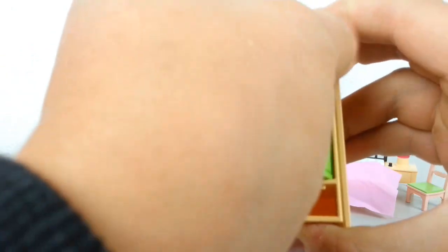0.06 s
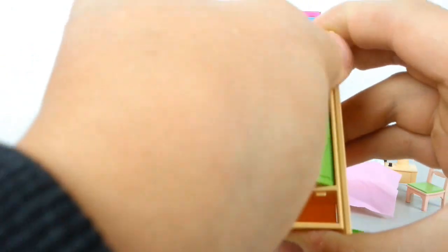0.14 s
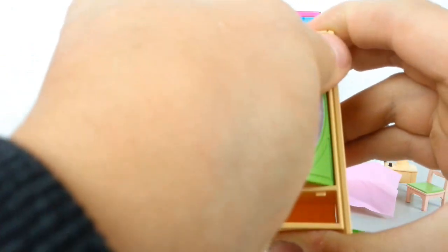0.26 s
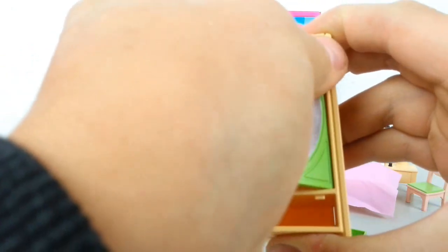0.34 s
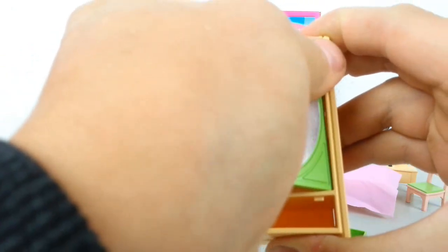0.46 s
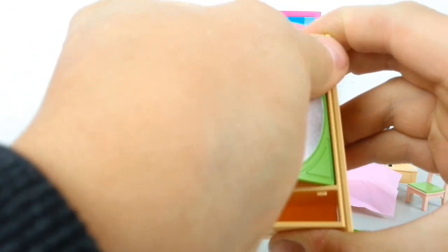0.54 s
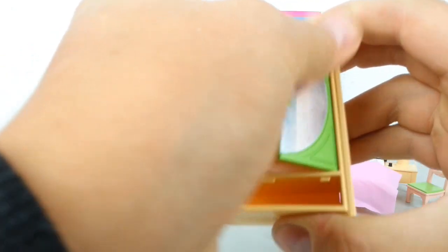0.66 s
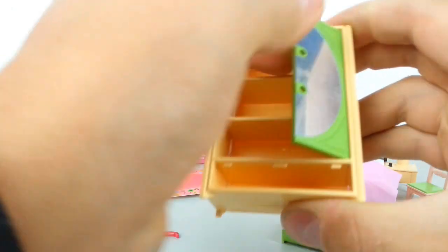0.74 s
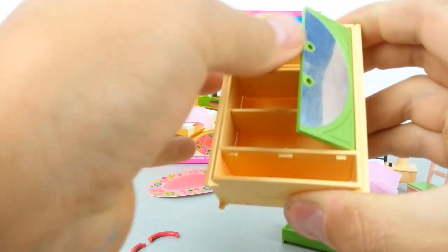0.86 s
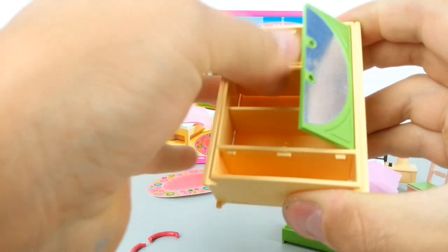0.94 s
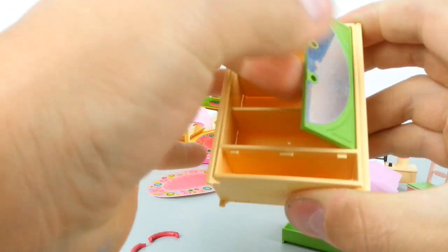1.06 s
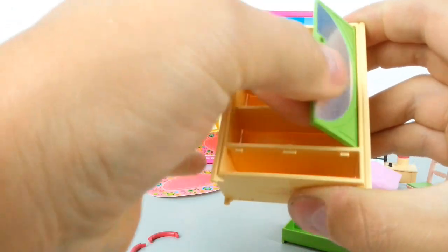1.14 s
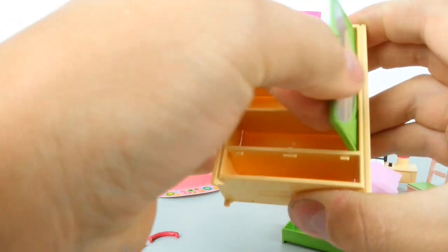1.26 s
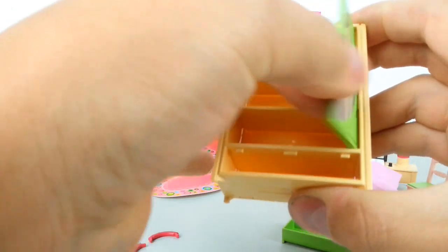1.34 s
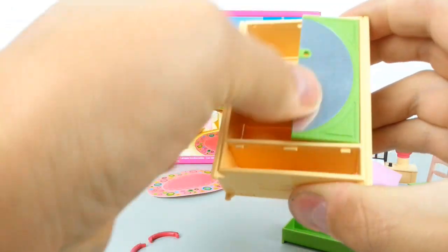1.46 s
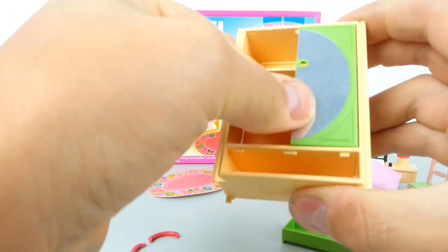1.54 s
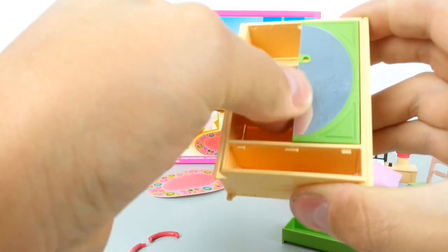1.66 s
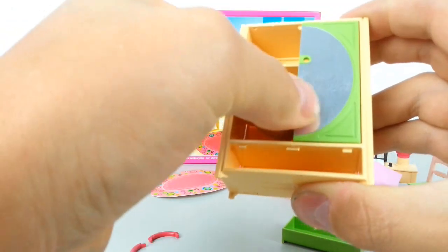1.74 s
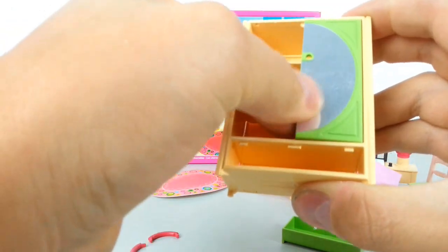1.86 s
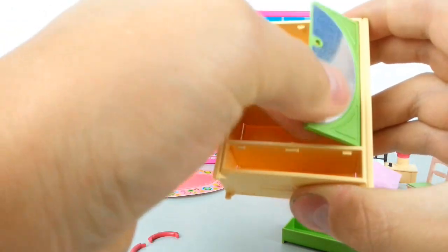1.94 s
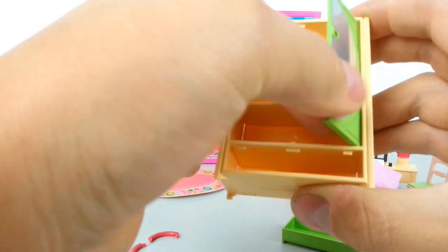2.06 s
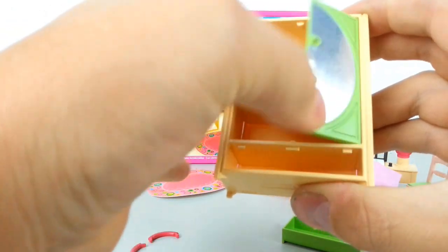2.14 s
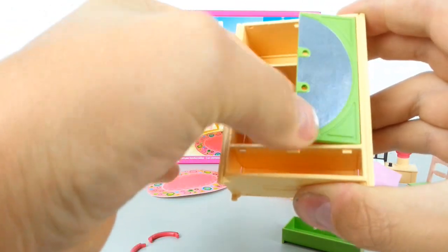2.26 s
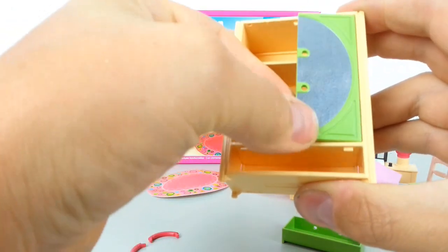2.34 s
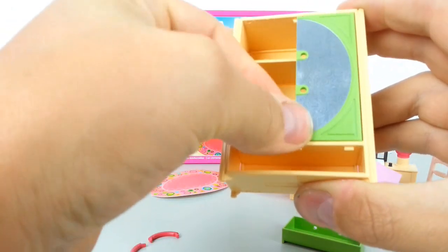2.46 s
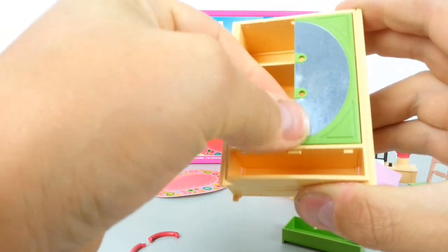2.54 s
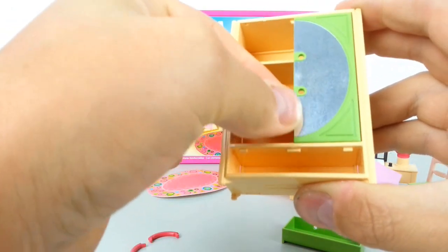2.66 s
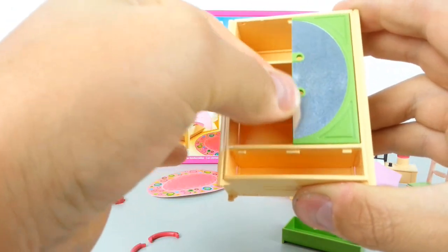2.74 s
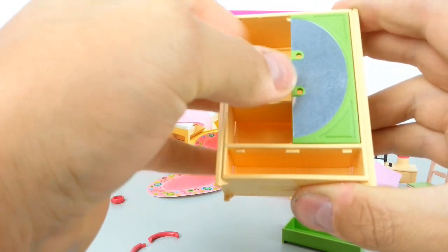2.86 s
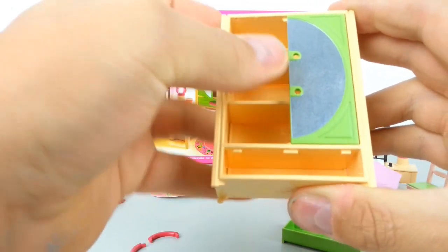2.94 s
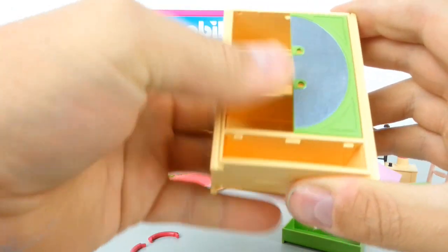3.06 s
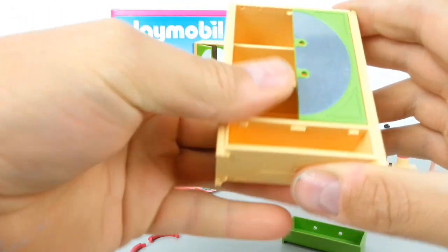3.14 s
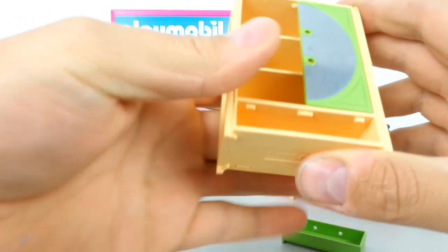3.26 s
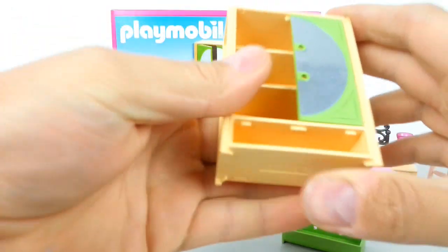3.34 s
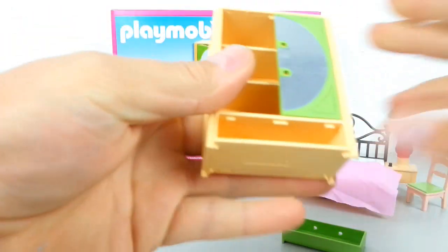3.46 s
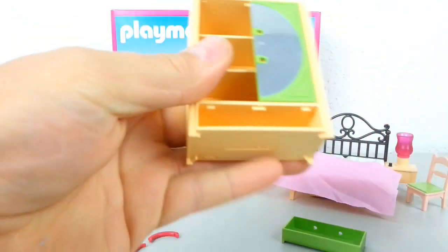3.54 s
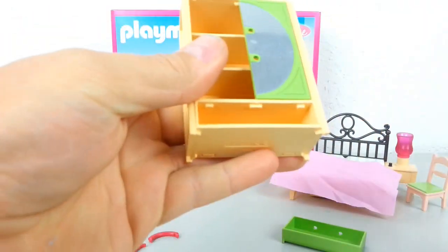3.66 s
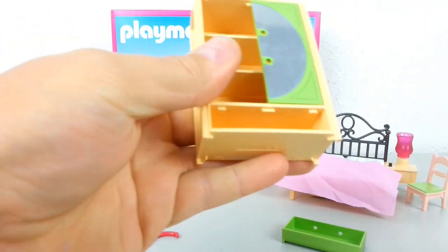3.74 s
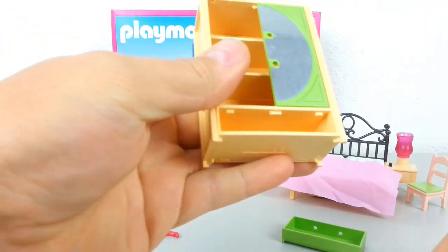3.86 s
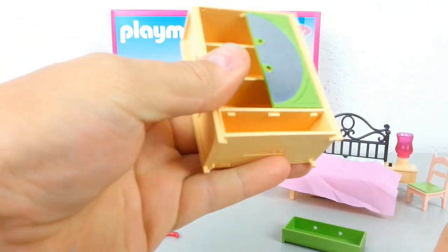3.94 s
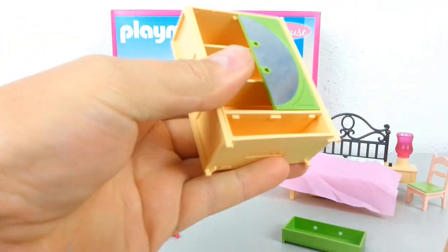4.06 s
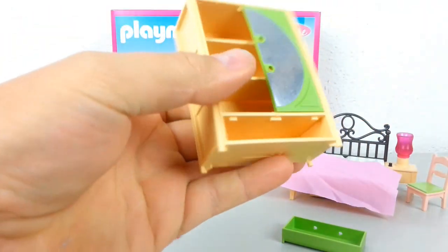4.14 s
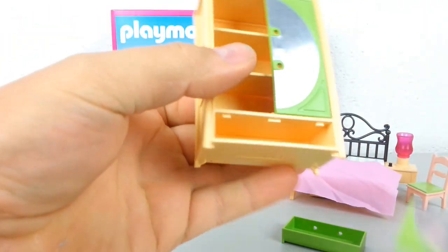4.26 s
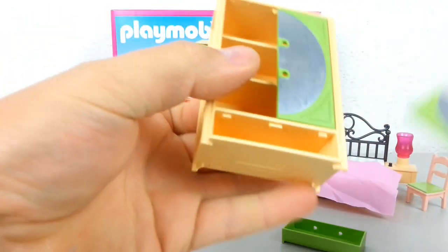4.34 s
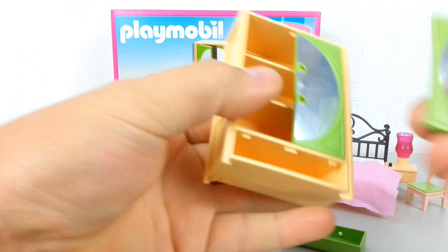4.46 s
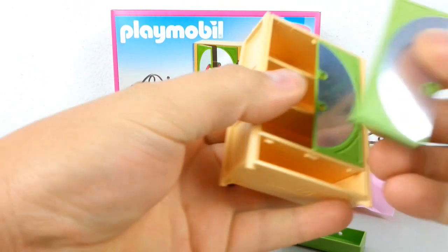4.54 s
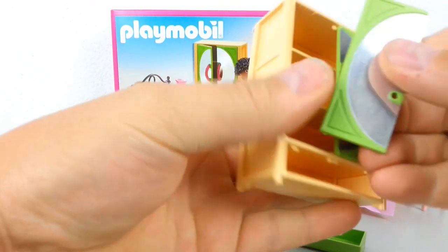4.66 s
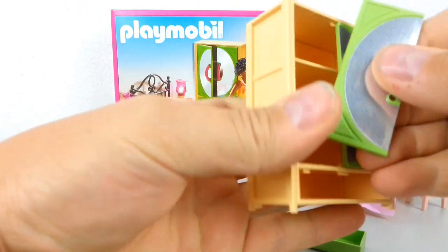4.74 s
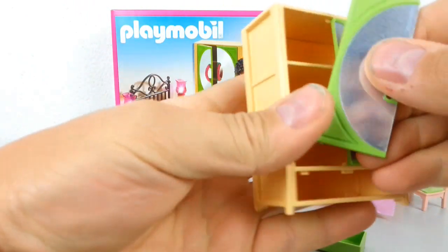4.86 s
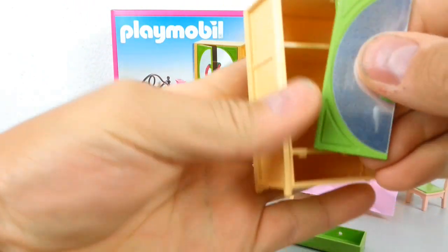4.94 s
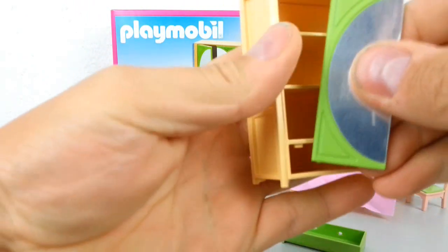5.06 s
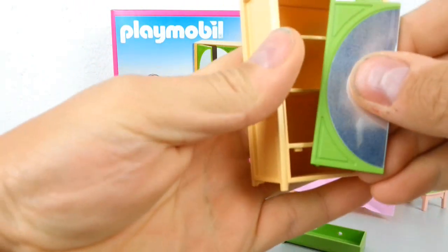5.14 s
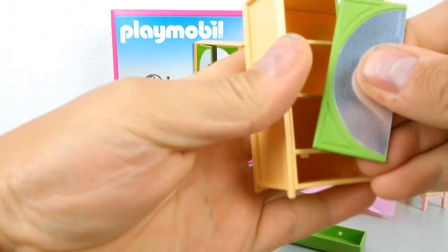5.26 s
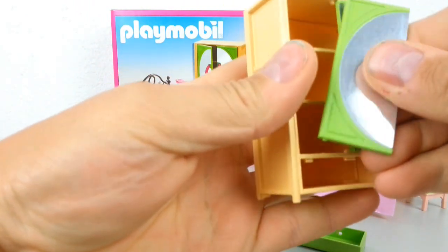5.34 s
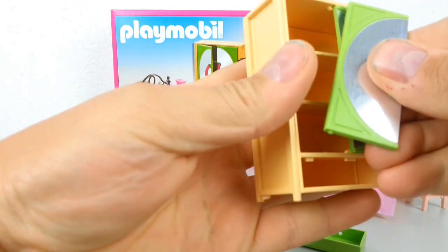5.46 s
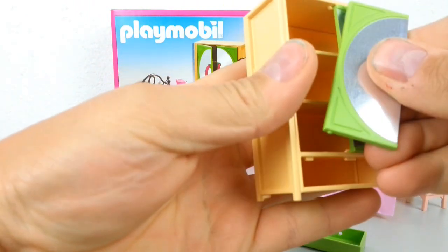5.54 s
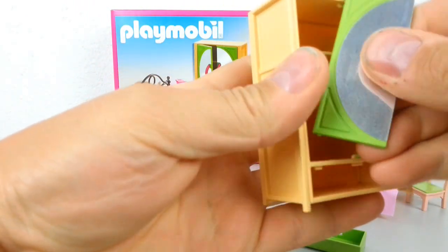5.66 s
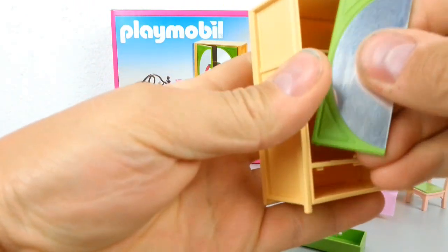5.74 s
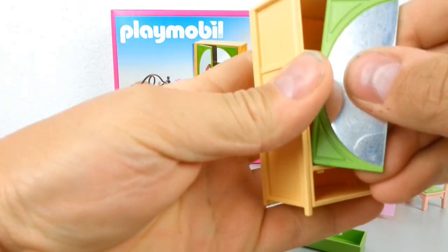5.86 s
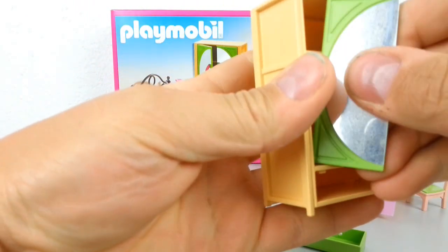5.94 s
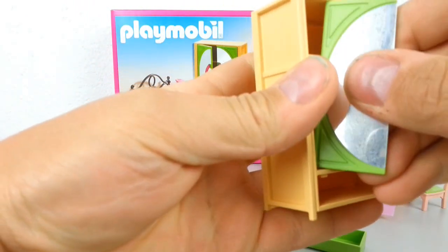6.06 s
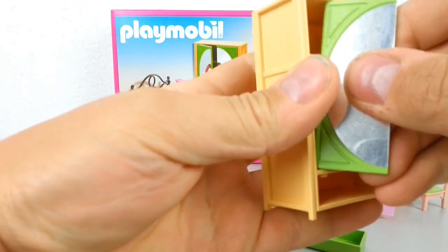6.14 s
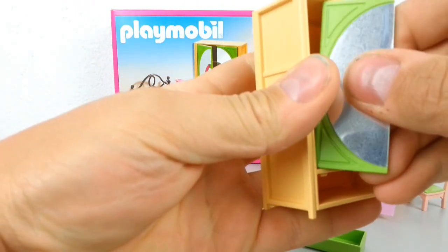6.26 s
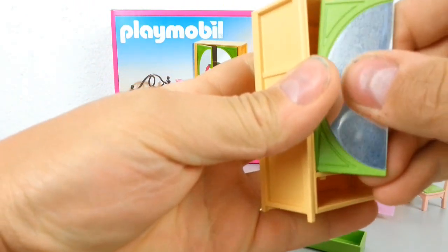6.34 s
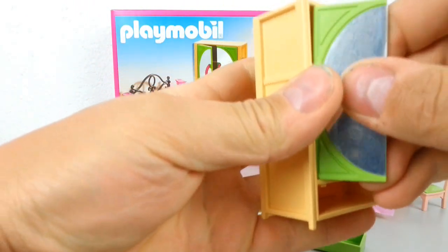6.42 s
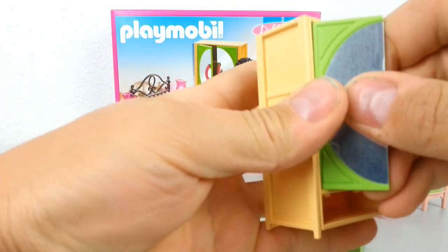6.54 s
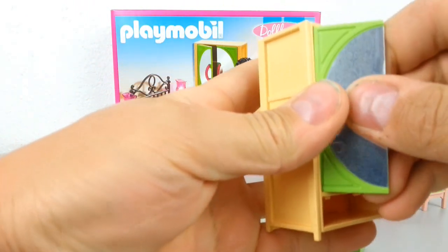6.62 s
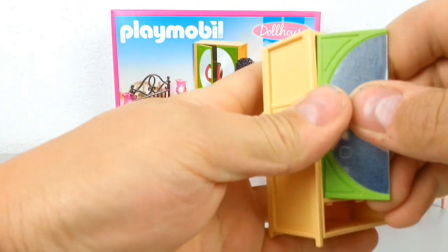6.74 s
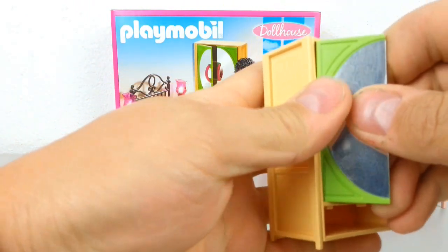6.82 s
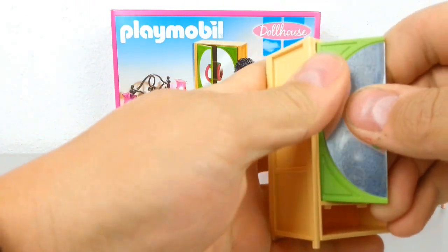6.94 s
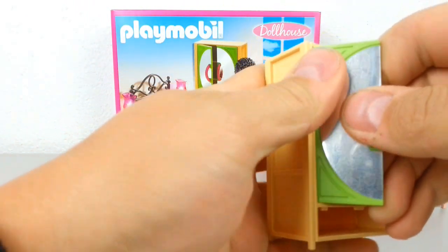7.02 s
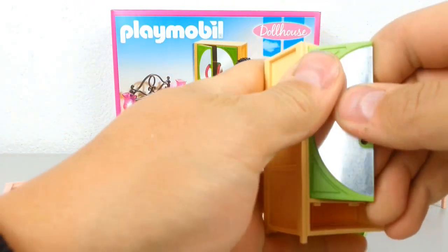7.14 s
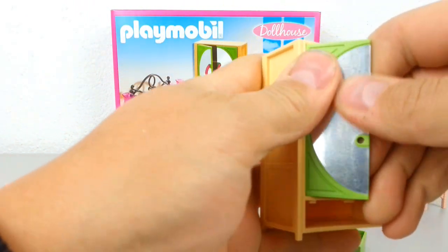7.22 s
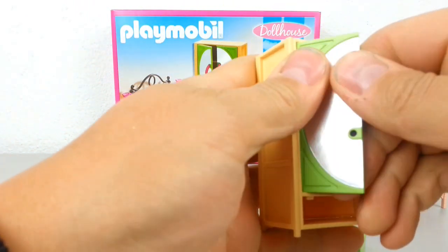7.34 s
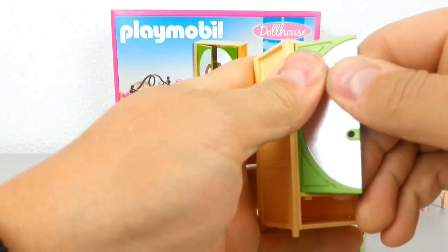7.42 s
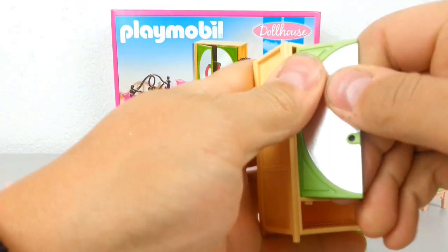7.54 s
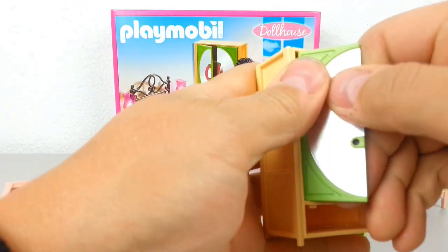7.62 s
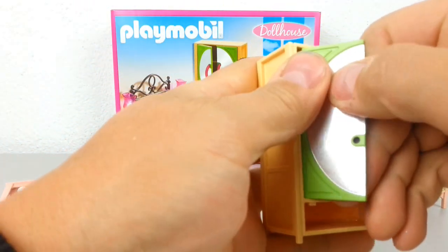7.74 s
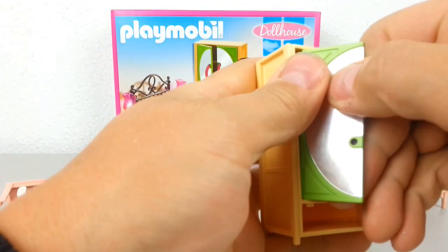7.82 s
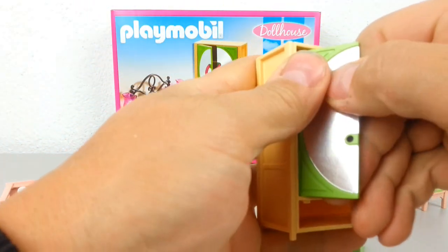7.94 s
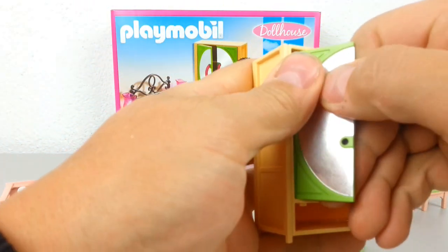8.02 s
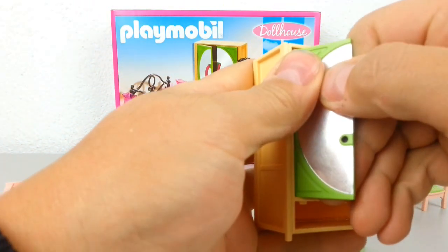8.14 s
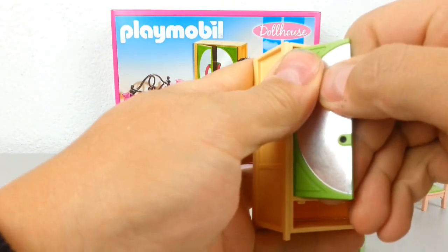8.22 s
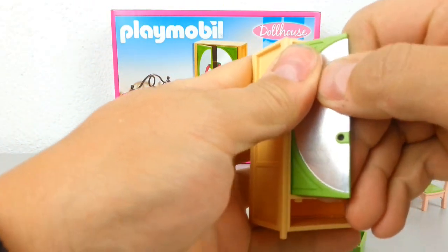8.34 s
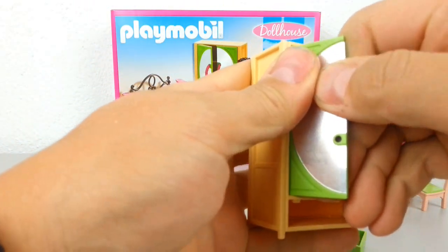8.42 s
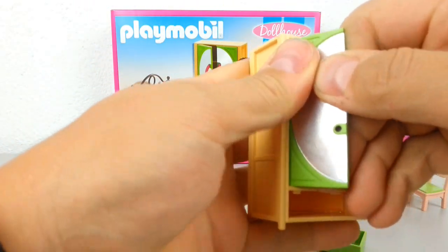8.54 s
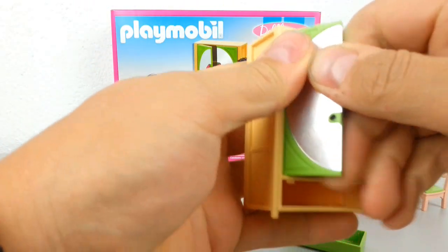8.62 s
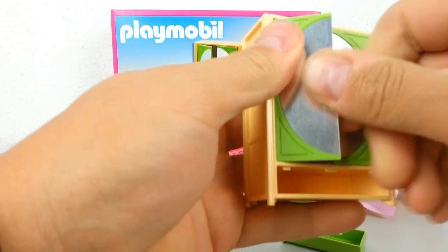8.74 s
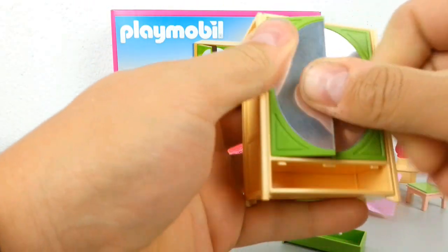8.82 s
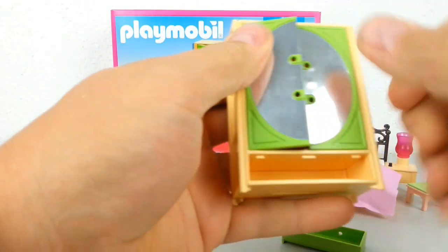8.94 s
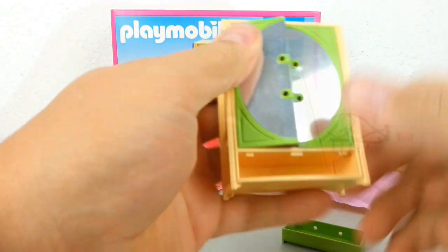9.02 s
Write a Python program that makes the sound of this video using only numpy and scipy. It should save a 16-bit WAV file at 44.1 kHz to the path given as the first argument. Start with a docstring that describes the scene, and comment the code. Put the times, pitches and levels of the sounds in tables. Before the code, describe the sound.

Small hollow plastic toy wardrobe ticks, knocks and scrapes in handling hands, with two sharp hinge snaps, heard very close in a small room.

```python
"""Doors tick and knock on a small hollow plastic toy wardrobe, close to a stereo microphone in a small room.
Each contact rings decaying tones; twice a hinge pin snaps home with a crack, a ring and a brief low thump,
overloading the input. A door scrapes along the case in swelling strokes of rough, filtered noise.
Between these, hands bump the case, palms rub it dully and fingertips rustle, all as shaped noise and low tones.
A small room answers the contacts, scrapes and snaps, over a quiet background noise."""
import sys
import numpy as np
from scipy import signal
from scipy.fft import rfft, irfft, next_fast_len
from scipy.io import wavfile
from scipy.ndimage import map_coordinates

SR = 44100
rng = np.random.default_rng(int(sys.argv[2]) if len(sys.argv) > 2 else 0)


def dump(signal):
    """Clip the signal to [-1, 1] and save it as 16-bit WAV at the path in sys.argv[1]."""
    limited = np.clip(np.atleast_2d(signal).T, -1, 1)
    pcm = np.round(limited * 32767).astype(np.int16)
    wavfile.write(sys.argv[1], SR, pcm)


N = 400428
TIME = np.arange(N) / SR  # s, through the whole scene
AGE = np.arange(SR // 2) / SR  # s, since one blow

# door and case contacts: start_s, middle_db, knock_db and edge_db (both relative to middle_db), slip_ms, spot (name)
CONTACTS = [(0.032, -38, -14, -8.5, 3.5, "side"), (0.565, -26, -11, -23.5, 0.542, "back"),
            (0.648, -21, -30.5, -1, 6, "back"), (0.874, -47.5, -15.5, -2, 0.275, "hinge"),
            (0.89, -44.5, -15.5, 4.5, 0.294, "rim"), (1.005, -47, -11, -3.5, 0.265, "door face"),
            (1.1624, -28.5, -20.5, -5.5, 0.26, "door face"), (1.183, -35, -21.5, -3.5, 2.76, "door face"),
            (1.277, -52.5, -15.5, -3, .3, "door face"), (1.336, -44, -32.5, -14.5, 0.34, "door face"),
            (1.5924, -44.5, -19.5, -9, 0.373, "door edge"), (1.647, -40, -1.5, 5, 4.28, "door edge"),
            (1.6592, -22.5, -14, -8, 0.292, "door edge"), (1.695, -32.5, -13, -7, 5, "side"),
            (1.703, -29, -9, -6.5, .3, "shelf"), (1.774, -37, -5, 5, 1.535, "door edge"),
            (2.083, -36, -8.5, -10, 0.252, "door stop"), (2.095, -17, -13.5, -3.5, 3.84, "door stop"),
            (2.275, -53, -17.5, -18.5, 0.32, "door face"), (2.4258, -54, -1, -1, 0.27, "door edge"),
            (2.522, -44.5, -11.5, -7.5, 0.308, "side"), (2.616, -36.5, -6.5, -8, 3.4, "side"),
            (2.627, -41, -22, -3.5, 3.044, "side"), (2.6367, -35.5, -6, 2.5, 0.319, "door edge"),
            (3.4057, -37.5, 4.5, -8, 0.986, "back"), (3.844, -43.5, 3.5, -18, .3, "back"),
            (4.114, -41.5, 6.5, -9, 5, "corner"), (4.3118, -42, -11, 0.5, 0.33, "rim"),
            (4.368, -28, -16, -4, 3, "rim"), (5.069, -44, -1.5, -3, 0.303, "door edge"),
            (6.0853, -38.5, -28, 1.5, 0.33, "hinge"), (6.138, -37.5, -16.5, -13, 4.59, "hinge"),
            (6.37, -33.5, -16.5, -16.5, 8.4, "door edge"), (6.38, -25.5, -20, -5.5, 1.894, "hinge"),
            (6.5196, -41.5, -14.5, -23, 7.2, "shelf"), (6.586, -34, -17.5, -15.5, 2.51, "side"),
            (6.597, -37.5, -29, -12.5, 7.3, "shelf"), (6.6249, -40, -22.5, -10, 6.65, "side"),
            (6.642, -41, -21.5, -11.5, 5.86, "shelf"), (6.8445, -40.5, -16, -6.5, 0.307, "side"),
            (6.984, -42.5, -2, -19.5, 3.7, "door stop"), (7.3, -48.5, -11, -10.5, 0.267, "corner"),
            (7.694, -54, -5.5, -4.5, 0.284, "corner"), (8.047, -40, 1.5, 5.5, 1.4, "corner"),
            (8.0698, -28.5, -11, -12.5, 0.347, "shelf"), (8.342, -54.5, 2.5, 0.5, 0.264, "corner"),
            (8.415, -48.5, -6, -2.5, 0.22, "corner"), (8.47, -42.5, -28, -6, 0.195, "shelf"),
            (8.837, -39, -18, 0, 3.5, "shelf"), (8.854, -39, -7, -3.5, 3.23, "corner"),
            (8.9221, -36.5, -14, 1, 0.31, "corner"), (9.053, -50, -15.5, -.5, 0.31, "side")]
# where door and case meet, with the leading tones there: knock_hz, wall_hz, wall_db, door_hz, door_db
CONTACT_SPOTS = {"back": (260, 1100, 16, 2200, 3), "door face": (575, 1592, 13.4, 2510, 13.1),
                 "door edge": (250, 1550, 11.04, 3204, 5.17), "door stop": (714, 1328, 8.2, 2362, 4.5),
                 "shelf": (275, 1259, 13.27, 2508, 2), "side": (260, 1294, 8.86, 3400, 6.9),
                 "rim": (423.5, 1930, 0.5, 2142.5, 3), "hinge": (702.5, 1607, 10.44, 3760, 16.47),
                 "corner": (274.5, 1231, 7.04, 3937, 10.2)}
# tones of the hollow case: pitch_hz, level_db, fade_s (time to fall 60 dB)
CASE_TONES = [(253.68, -15.5, 0.24), (389.5, -8, 0.025), (574, -12, .03), (664, -5, 0.05),
              (1190, -5, 0.016), (1261, -0.5, 0.034), (1551, 1.5, .03), (1647, -9.5, 0.035),
              (2130, -7, 0.0084), (2580, -7.5, 0.0067), (2963, -6.5, 0.054), (3036, -0.5, .018),
              (3470, -2, 0.043), (3967, 0, 0.012), (4548, -4.5, 0.04), (4850, -5.5, .014),
              (7810, -13.5, 0.013)]
# colour of the rattle in each contact: pitch_hz, level_db (relative)
RATTLE_COLOUR = [(120, -22.5), (250, -1.5), (800, -6.5), (1400, 8.5), (4200, -1), (6000, -9.5), (9000, -13),
                 (15000, -23.5)]
# hinge pins snapping home: start_s, ring_db, crack_db, thump_db
PIN_SNAPS = [(0.5971, 7, 3, -13), (8.563, 2.5, -6.5, -55)]
# tones of the first and the second door: pitch_hz, level_db, fade_s (time to fall 60 dB)
DOOR_TONES = [
    [(1003.5, -9.5, 0.029), (1062.3, -2.5, 0.037), (1154.9, -8.5, 0.037), (1296, -11.5, 0.039),
     (1623, -15, .03), (2198.8, -9, 0.053), (2267.4, -5.5, 0.082), (2816, -12.5, 0.024),
     (3512.3, -15.5, 0.041), (3980, -12.5, .022), (4648, -17, 0.015)],
    [(663, -27, 0.0956), (1155.3, -5.5, 0.03), (1292.7, 0, 0.048), (1375.8, -6, 0.0367),
     (1723, -5.5, 0.0165), (2065.3, -9, 0.033), (3350, -10.5, 0.0274), (3727.5, -12, 0.0278),
     (4368, -13.5, 0.0216), (8033, -8.5, 0.0133)],
]
# colour of the snap's crack: pitch_hz, level_db (relative)
CRACK_COLOUR = [(90, -56), (260, -23), (450, -24.5), (800, -10.5), (1200, -0.5), (2500, -1.5), (4200, -1.5),
                (6000, -10.5), (9500, -11), (15000, -24)]
# sliding strokes: peak_s, level_db (before the scrape gain), rise_s (time to rise 20 dB), panel_hz
STROKES = [(0.06, -53, 0.07, 3650), (1.04, -54.5, 0.053, 2510), (1.179, -43, 0.0122, 1600),
           (1.35, -50, 0.0406, 1734), (1.681, -38, 0.019, 1463), (2.72, -52.5, 0.0243, 3350),
           (2.992, -53, 0.047, 2016), (3.176, -52.5, 0.027, 2390), (3.281, -43.5, 0.0257, 4320),
           (3.314, -43.5, 0.0227, 2353), (3.456, -40.5, 0.057, 2220), (3.62, -53, 0.12, 4430),
           (4.166, -39.5, 0.0586, 3370), (4.196, -35.5, 0.0224, 3840), (4.26, -49.5, 0.017, 2155),
           (4.367, -26, 0.0489, 1280), (4.69, -47, 0.065, 1590), (4.929, -44, 0.0626, 3570),
           (5.2, -52, 0.092, 2304), (6.008, -47.5, 0.0573, 1685), (7.02, -55, 0.072, 4250),
           (7.472, -51.5, 0.079, 1250), (8.061, -40, 0.0198, 3686), (8.975, -48, 0.025, 1574)]
# colour of the sliding noise: pitch_hz, level_db (relative)
SCRAPE_COLOUR = [(120, -50), (300, -4), (900, 0.5), (1400, 1), (2000, -0.5), (4000, 0), (6000, -14),
                 (10000, -15.5), (15000, -37.5)]
# colour of the biting edge: pitch_hz, level_db (relative)
BITE_COLOUR = [(2500, -21.5), (5000, -2), (6000, -5), (9000, -12), (14500, -24.5)]
# case resonances that rubbing excites: pitch_hz, width_hz, level_db
RUBBED_TONES = [(1204, 200, 0), (1600, 160, -5.5), (2290, 80, -3), (3547, 95, -5), (4080, 46, -8),
                (4305, 93, -4), (4819, 120, -3.5)]
# soft bumps of the hand on the case: start_s, level_db
HAND_BUMPS = [(3.845, -36), (4.118, -44.5)]
# hollow after-ring of the bumps: pitch_hz, level_db, fade_s (time to fall 60 dB)
HOLLOW_TONES = [(129.3, -12.5, 0.774), (161.52, -13.5, 0.304), (202.9, -4.5, 0.515), (283.8, -15.5, 0.45),
                (356.7, 4, 0.137)]
# rubbing while the hands settle, before the layer gains: start_s, palm_db, fingertip_db
HANDS_SETTLING = [(0.0, -59.5, -49.5), (0.332, -67.5, -66), (0.54, -66.5, -66.5)]
# rubbing while they turn the case and fit the door: start_s, palm_db, fingertip_db
HANDS_TURNING = [(0.95, -60.5, -60.5), (1.48, -66.5, -63), (2.38, -62.5, -61), (3.14, -66.5, -65.5),
                 (3.56, -54.5, -47.5), (3.87, -56.5, -57), (4.17, -59.5, -67), (4.27, -58, -54),
                 (5.11, -56.5, -55.5), (5.28, -63, -62), (5.79, -70.5, -68), (6.1, -61, -59),
                 (6.4, -63.5, -67.5), (6.54, -60.5, -60), (6.79, -66, -66), (7.32, -59.5, -59.5),
                 (7.68, -65, -63.5), (8.5, -63, -64.5)]
# rubbing while they let go: start_s, palm_db, fingertip_db
HANDS_LETTING_GO = [(8.88, -55.5, -58.5), (8.96, -61, -56.5), (9.08, -61.5, -57.5)]
# colour of the palms: pitch_hz, level_db (relative)
PALM_COLOUR = [(50, -22), (110, -14), (200, 0.5), (300, 0), (450, -7), (800, -8.5), (1400, -25.5)]
# colour of the fingertips: pitch_hz, level_db (relative)
FINGER_COLOUR = [(400, -22.5), (900, -3.5), (1280, -3.5), (1600, 0.5), (2000, -4.5), (2500, -3.5),
                 (4400, -7), (6000, -16.5), (10000, -19), (15000, -27)]
# how long the room rings: pitch_hz, fade_s (time to fall 60 dB)
ROOM_FADE = [(150, 0.47), (600, 0.48), (1200, .45), (4000, .42), (7000, .36), (14000, 0.22)]
# colour of the background noise: pitch_hz, level_db (relative)
QUIET_COLOUR = [(15, -47.5), (25, -24.5), (87, -8), (179, -10), (240, -19.5), (368, -18), (443, -22.5),
                (480, -14), (716, -21), (910, -20.5), (1010, -20.5), (2780, -23), (6350, -27.5),
                (12400, -25.5), (14500, -30.5)]

KNOCK_CYCLES, WALL_CYCLES, DOOR_CYCLES = 28, 51, 100  # cycles in which a leading tone falls 60 dB
DETUNE = 0.012  # typical random shift of a leading tone from blow to blow (share of its pitch)
CLICK_PAN_DB = -1.5  # left minus right
RELEASE_OVER_RISE = 1.05  # a stroke dies about as fast as it swells
SCRAPE_GAIN_DB, PANEL_DB = 2.0, -8  # gain of all strokes; singing panel relative to the sliding noise
BITE_LEAD_S, BITE_DB = 0.0164, -11  # the edge bites before the stroke peaks; level relative to the slide
HARD_STROKE_DB, BITE_GROWS = -43, 0.57  # softer strokes bite less: dB of bite per dB below a hard stroke
PALM_GAIN_DB, FINGER_GAIN_DB = 3, 4
FAINT_DB = -66.5  # fingertip rubbing near or below this level is turned down further
QUIET_DB = -58
TOP_HZ = 14800  # upper band limit


def clicks():
    """Each contact rings the case; the spot where it lands decides which knock, wall and door tones lead."""
    out = np.zeros((2, N))
    size = SR // 8
    # knock, middle and edge bands, in Hz
    edges_hz = ((150, 850), (850, 2000), (2000, 15000))
    bands = [signal.butter(3, edges, "band", fs=SR, output="sos") for edges in edges_hz]
    pan = amp([[CLICK_PAN_DB / 2], [-CLICK_PAN_DB / 2]])
    for start, middle_db, knock_db, edge_db, slip_ms, spot in CONTACTS:
        knock_hz, wall_hz, wall_db, door_hz, door_db = CONTACT_SPOTS[spot]
        tones = [(knock_hz, -3, KNOCK_CYCLES), (wall_hz, wall_db, WALL_CYCLES), (door_hz, door_db, DOOR_CYCLES)]
        leading = [(hz * (1 + DETUNE * rng.standard_normal()), db, cycles / hz) for hz, db, cycles in tones]
        jolts = slips(slip_ms, growth_db=7.5)
        tap = ring(CASE_TONES, side=1.0, scatter_db=5.5, size=size)
        tap = tap + ring(leading, side=0.41, scatter_db=1, size=size)
        ringing = signal.fftconvolve(tap, jolts[None], axes=1)
        # every jolt also rattles the loose parts anew, so the rattles add in power
        one_rattle = amp(3 - 60 * AGE[:size] / 0.05)
        shaking = np.sqrt(np.convolve(jolts ** 2, one_rattle ** 2))
        hit = ringing + shaking * noise(RATTLE_COLOUR, side=0.86, size=len(shaking))
        # the hardness of the contact shares the blow between knock, middle and edge
        for band, relative_db in zip(bands, (knock_db, 0, edge_db)):
            part = signal.sosfilt(band, hit)
            strength = np.sqrt(np.mean(part[:, :round(0.015 * SR)] ** 2))  # over the first 15 ms
            add(out, start, pan * amp(middle_db + relative_db) * part / strength)
    return out


def slips(slip_ms, growth_db):
    """Stick-slip: sliding gives sparse, uneven, growing jolts up to a last firm one; a short tap may have only that."""
    length = round(abs(slip_ms) * SR / 1000) + 1
    uneven = rng.standard_normal(length)
    chosen = rng.random(length) < 0.04
    force = uneven * chosen * amp(np.linspace(-growth_db, 0, length))
    force[-1] = 1
    return force


def snaps():
    """A bent door lets go as its pin finds the hole: a crack, a hard ring and one brief low thump."""
    rings, cracks, thumps = np.zeros((3, 2, N))
    thump_age = AGE / 0.006  # in steps of 6 ms
    thump = ((1 - thump_age) * np.exp(-thump_age))[None]
    for (start, ring_db, crack_db, thump_db), tones in zip(PIN_SNAPS, DOOR_TONES):
        crack = noise(CRACK_COLOUR, side=0.66, size=len(AGE)) * amp(crack_db - 60 * AGE / 0.04)
        add(cracks, start, crack)
        add(rings, start, amp(ring_db) * ring(tones, side=0.6, scatter_db=0.5))
        add(thumps, start, amp(thump_db) * thump)
    # the flat door beams its ring at the microphone, while the crack spreads all round the room
    scattered = cracks + amp(-5) * rings
    return rings + cracks + thumps + room(scattered, wet_db=-7, near_db=-6)


def scrapes():
    """Plastic slides in clumps of tiny slips that swell and die with each stroke and set one panel singing."""
    out = np.zeros((2, N))
    grip = amp(2.03 * wobble(98) + 2.88 * wobble(900))
    friction = rubbed(noise(SCRAPE_COLOUR, side=0.733, grip=grip), plain=2.51)
    bite = amp(BITE_DB) * noise(BITE_COLOUR, side=1.0, grip=grip)
    for peak, level_db, rise, panel_hz in STROKES:
        span = slice(max(round((peak - 0.3) * SR), 0), round((peak + 0.4) * SR))
        rubbing = friction[:, span]
        panel_filter = signal.iirpeak(panel_hz, 20, SR)
        panel = amp(PANEL_DB) * unit(signal.lfilter(*panel_filter, rubbing))
        slide = stroke(peak, rise)[span] * (rubbing + panel)
        bite_strength = amp(BITE_GROWS * min(level_db - HARD_STROKE_DB, 0))
        edge = bite_strength * stroke(peak - BITE_LEAD_S, 0.568 * rise)[span] * bite[:, span]
        out[:, span] += amp(level_db + SCRAPE_GAIN_DB) * (slide + edge)
    return out


def stroke(peak, rise):
    """Pressure of one slide: it swells to its peak and dies away, 20 dB per rise or release time."""
    before = (peak - TIME) / rise
    after = (TIME - peak) / (rise * RELEASE_OVER_RISE)
    return amp(-20 * np.maximum(before, after))


def rubbed(x, plain):
    """Friction noise, partly heard directly and partly through the resonances of the case."""
    def body(f):
        return sum(amp(db) * 1j * f * width / (hz * hz - f * f + 1j * f * width)
                   for hz, width, db in RUBBED_TONES)

    # the noise is played backwards here, so that it does not line up with the direct part
    resonant = unit(filtered(x[:, ::-1], body))
    return unit(plain * x + resonant)


def bumps():
    """Soft flesh starts gently and wakes only the lowest resonances, which hum on."""
    out = np.zeros((2, N))
    soft_start = 1 - np.exp(-AGE / 0.00273)
    for start, level_db in HAND_BUMPS:
        add(out, start, amp(level_db) * ring(HOLLOW_TONES, side=0.25, scatter_db=4.5) * soft_start)
    return out


def hands():
    """Palms rub the case dully while fingertips rustle over its ribs, both as unsteady coloured noise."""
    start, palm_db, finger_db = np.vstack([HANDS_SETTLING, HANDS_TURNING, HANDS_LETTING_GO]).T
    palm_level = amp(np.interp(TIME, start, palm_db) + PALM_GAIN_DB + 1.5 * wobble(25))
    palm = palm_level * noise(PALM_COLOUR, side=0.71, grip=amp(3.2 * wobble(120)))
    # faint fingertip rubbing is turned down further, so the background noise covers it
    slide = amp(np.interp(TIME, start, finger_db))
    slide = slide * slide / (slide + amp(FAINT_DB))
    finger_level = amp(FINGER_GAIN_DB + 1.6 * wobble(30)) * slide
    rustle = noise(FINGER_COLOUR, side=0.68, grip=amp(2.8 * wobble(400)))
    return palm + finger_level * rubbed(rustle, plain=1.1)


def room(x, wet_db, near_db):
    """Table and toys nearby add a short echo to the longer one of the walls; noise differs in each channel."""
    hz, t, pieces = signal.stft(rng.standard_normal((2, SR // 2)), SR, nperseg=256)
    fading = pieces * amp(-60 * t / along(ROOM_FADE, hz)[:, None])
    tail = signal.istft(fading, SR, nperseg=256)[1]
    age = np.arange(tail.shape[1]) / SR
    onset = np.clip(age / 0.003 - 1, 0, 1)  # silent for 3 ms, full at 6 ms
    near = amp(near_db - 60 * age / 0.1)
    answer = tail / np.linalg.norm(tail[0]) * onset * (1 + near)
    return amp(wet_db) * signal.fftconvolve(x, answer, axes=1)[:, :N]


def background():
    """Steady coloured noise, strongest in the bass, with a faint hiss on top."""
    return amp(QUIET_DB) * noise(QUIET_COLOUR, side=1.0)


def ring(tones, side, scatter_db, size=len(AGE)):
    """Struck tones start together, in alternating directions, shifted oppositely in left and right."""
    hz, db, fade = np.transpose(tones)[:, :, None]
    strength, skew = rng.uniform(-1.0, 1, (2, len(hz), 1))
    sign = (-1) ** np.arange(len(hz))[:, None]
    t = AGE[:size]
    envelope = sign * amp(db + abs(scatter_db) * strength - 60 * t / fade)
    channels = [envelope * np.sin(2 * np.pi * hz * t + way * side * skew) for way in (1, -1)]
    return np.array([channel.sum(0) for channel in channels])


def noise(colour, side, size=N, grip=1):
    """Coloured stereo noise of rms 1; grip makes it stronger and weaker before colouring."""
    white = grip * spread(rng.standard_normal((2, size)), side)
    return unit(filtered(white, lambda hz: amp(along(colour, hz))))


def wobble(rate):
    """A smooth random curve through a given rate of random points a second."""
    points = rng.standard_normal(int(N * rate / SR) + 4)
    return map_coordinates(points, [TIME * rate])


def spread(pair, side):
    """Left and right from a common part and a share of a differing part."""
    return np.array([pair[0] + side * pair[1], pair[0] - side * pair[1]])


def filtered(x, response):
    """Reshape the spectrum of x by a gain for each frequency."""
    n = x.shape[-1]
    padded = next_fast_len(n + 8192)
    spectrum = rfft(x, padded) * response(np.fft.rfftfreq(padded, 1 / SR))
    return irfft(spectrum, padded)[..., :n]


def along(points, hz):
    """Read a table of pitch and value at any pitch, on a log axis."""
    f, value = np.transpose(points)
    return np.interp(np.log(hz + 1), np.log(f + 1), value)


def add(track, start, sound):
    """Mix a sound in at a time, cutting it at the end of the track."""
    part = track[:, round(start * SR):][:, :sound.shape[1]]
    part += sound[:, :part.shape[1]]


def unit(x):
    """Scale to rms 1."""
    return x / np.sqrt(np.mean(x ** 2) + 1e-20)


def amp(db):
    """Decibels to gain."""
    return 10 ** (np.asarray(db) / 20)


def scene():
    """The toy, the hands and the room over a quiet background."""
    taps, strokes = clicks(), scrapes()
    quiet = background()
    echo = room(taps + amp(6) * strokes, wet_db=-15.5, near_db=8.5)
    toy = taps + strokes + echo
    return toy + snaps() + bumps() + hands() + quiet


def record(dry):
    """The input clips at full scale, then a steep filter removes what lies above the band limit."""
    clipped = np.clip(dry, -1, 1)
    return filtered(clipped, lambda hz: 1 / (1 + (hz / TOP_HZ) ** 80))


dry = scene()
out = record(dry)
dump(out)
```